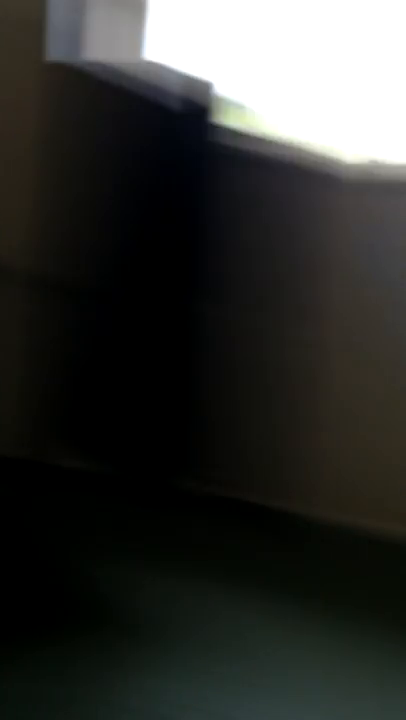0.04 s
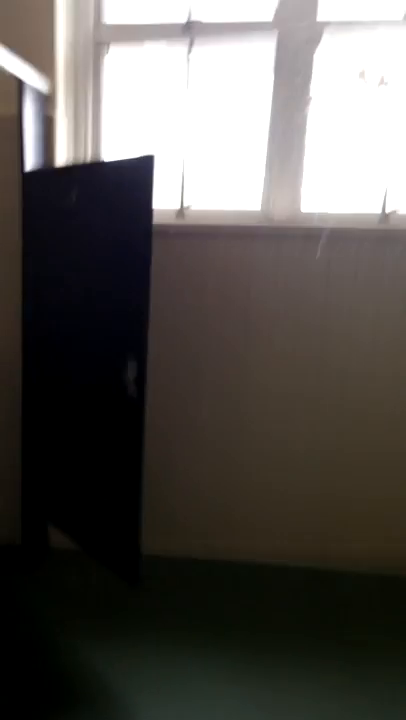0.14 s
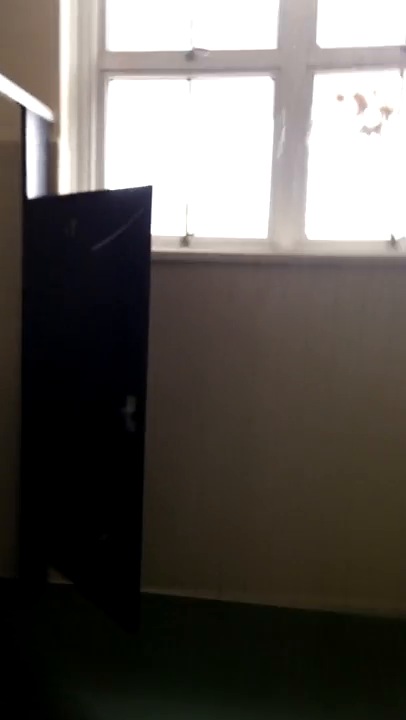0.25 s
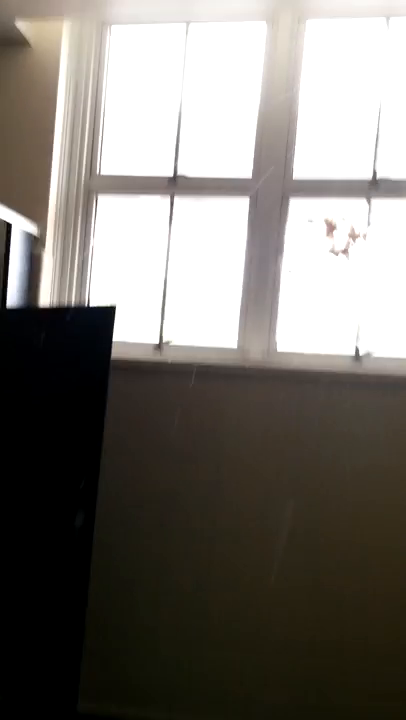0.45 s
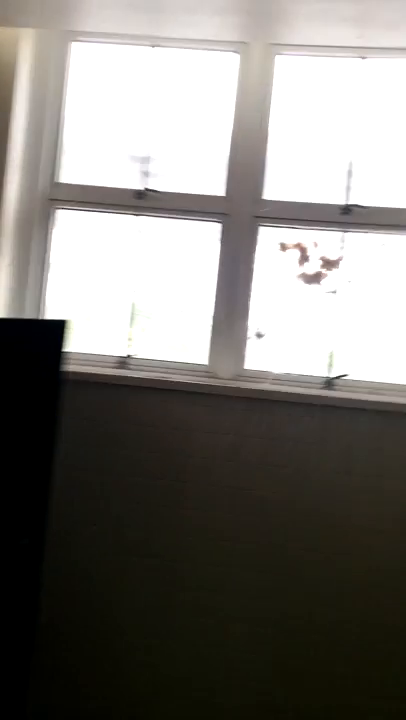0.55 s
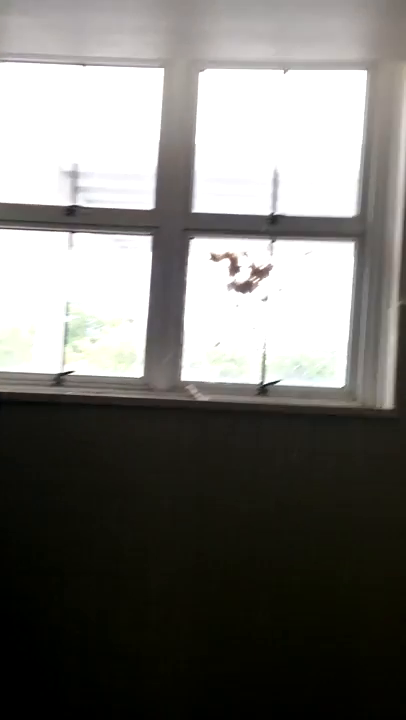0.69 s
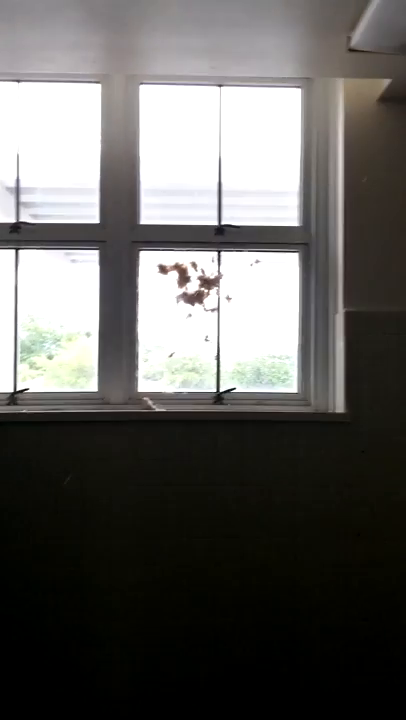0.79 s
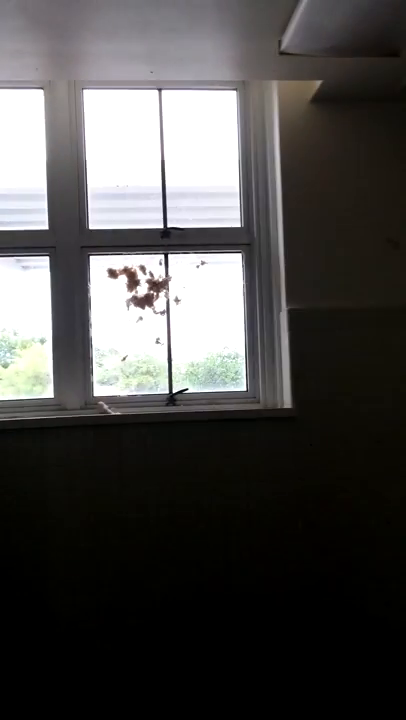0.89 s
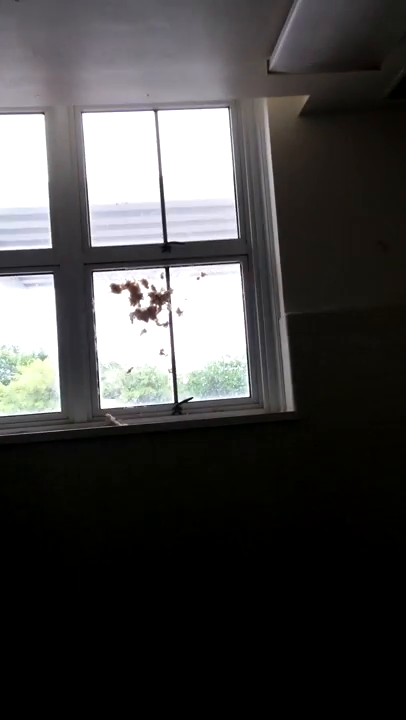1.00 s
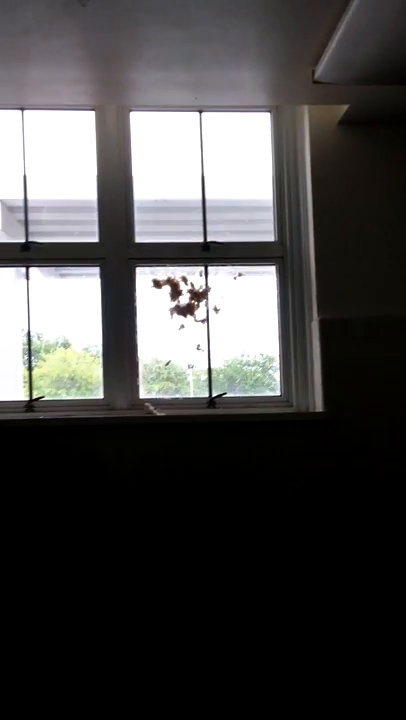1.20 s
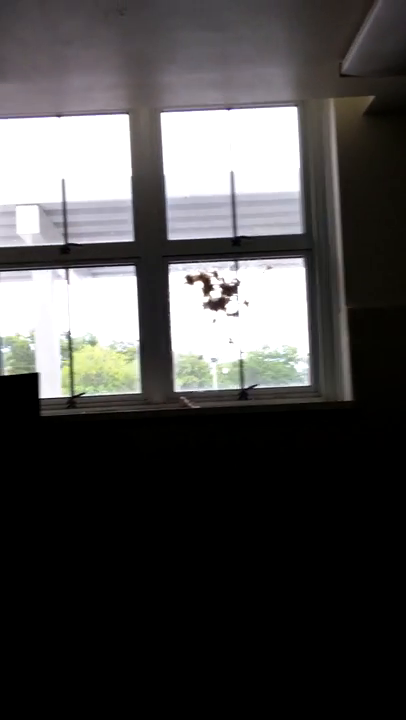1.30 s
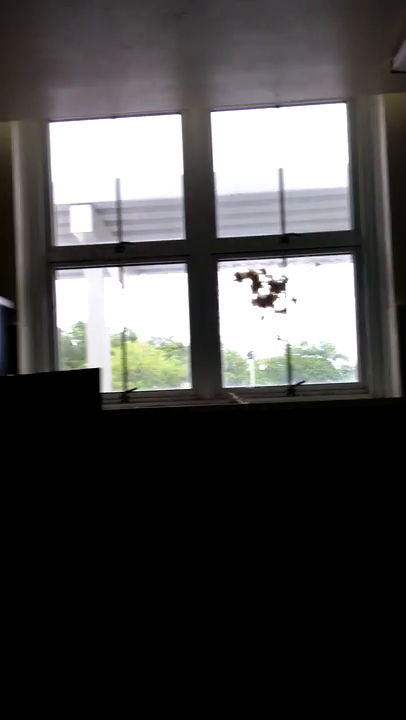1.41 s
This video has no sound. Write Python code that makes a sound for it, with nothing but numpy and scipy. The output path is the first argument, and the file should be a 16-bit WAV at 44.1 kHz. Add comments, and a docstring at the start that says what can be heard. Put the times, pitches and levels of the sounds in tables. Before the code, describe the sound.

A very loud bang of something wet bursting against a window comes at about 0.2 seconds, after a short fading hiss. Dense echoes and a low boom fill the tiled washroom and overload the microphone for a third of a second. Two scraps land with dull knocks near 0.65 and 0.8 seconds, each with a faint hiss of spray, while the echo rings on, growing duller and quieter.

```python
"""Something wet bursts against a window in a tiled washroom, as loud as a firecracker.
A short fading hiss comes first. Then the bang fills the hard room: a dense wash of echoes and a low
boom overload the microphone for a third of a second, then ring out ever duller.
A few scraps knock as they land and fine spray hisses down."""
import sys
import numpy as np
from scipy import signal
from scipy.fft import rfft, irfft, next_fast_len
from scipy.io import wavfile

SR = 44100
rng = np.random.default_rng(int(sys.argv[2]) if len(sys.argv) > 2 else 0)


def master_out(mix):
    """Clip the mix to full scale and print it as 16-bit PCM to the path in sys.argv[1]."""
    frames = np.transpose(np.atleast_2d(mix))
    ceiling = np.clip(frames, -1, 1)
    pcm = np.round(ceiling * 32767).astype(np.int16)
    wavfile.write(sys.argv[1], SR, pcm)


N = 63945

BANG_S, ATTACK_S = 0.2138, 0.0019  # when the bang starts, and how fast its echoes build up
# tone of the dense wash of echoes: f/Hz, level/dB
WASH_TONE = [(25, -13), (42, -6.5), (70, -12.5), (120, 2), (170, -3.5), (250, -2), (400, -7.5), (800, -7.5),
             (1500, -8.5), (3300, -11), (5500, -14), (10000, -19.5), (16000, -30.5)]
# time the wash takes to fade by 60 dB: f/Hz, t/s
WASH_FADE = [(35, 0.85), (100, 0.98), (300, 1.113), (1500, 1.147), (4000, 1.08), (8000, .88), (14000, 0.59)]
# tone of the longer ring between the bare walls: f/Hz, level/dB
RING_TONE = [(30, -33), (70, -7.5), (160, -9.5), (260, -7), (700, -4.5), (1400, -11.5), (2400, -16.5),
             (3300, -14.5), (4200, -14.5), (6000, -16), (12000, -56.5)]
# time that ring takes to fade by 60 dB: f/Hz, t/s
RING_FADE = [(100, 2.3), (700, 2.92), (3000, 2.91), (8000, 1)]
# the room's own notes (standing waves): f/Hz, level/dB, t/s to fade by 60 dB
ROOM_NOTES = [(70, -8, 1.5), (78.4, 0, 1.2), (92.6, -17, 1.8), (108.5, -11, 1.7), (157, -22, 2.4),
              (198, -13, 1.3), (246, -13, 1.4), (331, -13, 1.1), (350, -26, 2.6), (515, -19, 1.5),
              (538, -25, 2.5), (835, -22, 2), (3354, -31, 2.2)]
# scraps landing: t/s, level/dB
LANDINGS = [(0.651, -15), (0.781, -14)]
# showers of fine spray: t/s, level/dB
SHOWERS = [(.655, -38), (.81, -41)]
# tone of the spray: f/Hz, level/dB
SPRAY_TONE = [(1000, -28), (5000, 1), (10000, -6.5), (16000, -12)]
# tone of the hiss before the bang: f/Hz, level/dB
HISS_TONE = [(25, -22), (45, -9), (64, 1.5), (100, -15.5), (240, -16), (330, -14.5), (900, -19.5),
             (3800, -19), (7500, -23.5), (10400, -26.5), (16000, -32)]
# tone of the quiet room: f/Hz, level/dB
QUIET_TONE = [(25, -5), (60, 6.5), (300, -4), (3000, -33), (9000, -44), (16000, -49)]
# how alike the room sounds on the left and right: f/Hz, likeness (1 = the same)
LIKENESS = [(30, .9), (70, .99), (140, .97), (290, .88), (640, .55), (1400, .02), (15000, 0)]
# how much louder the left is than the right: f/Hz, level/dB
LEFT_OVER_RIGHT = [(60, 5.6), (300, -1.5), (700, -2.5), (1400, -1), (3100, -2), (7000, -2), (15000, -7)]
# tone of the microphone's left opening: f/Hz, level/dB
LEFT_TONE = [(20, -2.5), (50, 0.5), (90, 4.5), (250, 0), (600, 1.5), (3000, 0.5), (8000, 1), (9500, 2),
             (10400, 4), (11800, 4.5), (16000, 10)]
# tone of its right opening: f/Hz, level/dB
RIGHT_TONE = [(20, 0.5), (50, -0.5), (90, 5.5), (250, -0.5), (600, -2), (3000, 3.5), (8000, 0), (9500, 2.5),
              (10400, 7), (11800, -1.5), (16000, -9.5)]


def bang():
    """The hard walls throw the burst back as a strong wash of echoes and a weaker, longer ring."""
    wash = amp(7) * echoes(WASH_TONE, WASH_FADE)
    ring = amp(-14) * echoes(RING_TONE, RING_FADE)
    return wash + ring


def echoes(tone, fade_times, size=512):
    """Echoes blur into noise from the bang on, each frequency fading at its own speed."""
    hz, t, bands = signal.stft(room_noise(tone), SR, nperseg=size)
    fade = amp(-60 * np.maximum(t - BANG_S, 0) / along(fade_times, hz)[:, None])
    rise = 1 - np.exp(-since(BANG_S) / ATTACK_S)
    return signal.istft(bands * fade, SR, nperseg=size)[1][:, :N] * rise


def boom():
    """The blast sets the room's own notes ringing; notes close in pitch throb against each other."""
    t = since(BANG_S)
    notes = 0
    for k, (hz, db, fade_s) in enumerate(ROOM_NOTES):
        direction = -(-1) ** k  # neighbours start by swinging opposite ways
        notes += direction * amp(db) * dying(t, fade_s) * np.sin(2 * np.pi * hz * t)
    rise = 1 - np.exp(-t / 0.013)
    return amp(-2) * notes * rise


def scraps():
    """Each soft scrap lands with one dull push."""
    knocks = 0
    for start_s, db in LANDINGS:
        age = since(start_s) / 0.0003  # the push is strongest at age 1, after 0.3 ms
        knocks += amp(db) * age * np.exp(1 - age)
    return knocks


def spray():
    """Fine spray comes down in short, bright swells."""
    rise_s, hold_s = 0.029, 0.036
    swells = 0
    for start_s, db in SHOWERS:
        rise = np.minimum(since(start_s) / rise_s, 1)
        swells += amp(db) * rise * dying(since(start_s + hold_s), fade_s=0.44)
    return swells * room_noise(SPRAY_TONE)


def hiss():
    """A fading hiss with a low rumble, perhaps a fuse, that dies quickly once the bang comes."""
    slow_fade = amp(-27 - 26 * since(0))  # falls 26 dB each second
    ending = dying(since(BANG_S), fade_s=0.32)
    return slow_fade * ending * room_noise(HISS_TONE)


def room_noise(tone):
    """Stereo noise from all sides: left and right are alike in the bass, unrelated in the treble."""
    def share(hz):
        angle = np.arccos(np.clip(along(LIKENESS, hz), -1, 1)) / 2
        return amp(along(tone, hz)) * [np.cos(angle), np.sin(angle)]

    common, opposite = filtered(rng.standard_normal((2, N)), share)
    pair = np.array([common + opposite, common - opposite])
    pair = filtered(pair, lambda hz: amp(np.outer([.5, -.5], along(LEFT_OVER_RIGHT, hz))))
    return pair / np.sqrt(np.mean(pair ** 2) + 1e-20)  # average strength of 1


def amp(db):
    """Turn decibels into a number to multiply by."""
    return 10 ** (np.asarray(db) / 20)


def along(points, hz):
    """Read a table between its frequencies, with octaves evenly spaced."""
    f, values = np.transpose(points)
    return np.interp(np.log(hz + 1), np.log(f + 1), values)


def since(s):
    """Seconds since a moment, zero before it."""
    return np.maximum(np.arange(N) / SR - s, 0)


def dying(t, fade_s):
    """A fade that drops 60 dB every fade_s seconds."""
    return np.exp(-np.log(1000) * t / fade_s)


def filtered(x, response):
    """Multiply each frequency in x by response(hz)."""
    size = next_fast_len(N + SR // 2)
    hz = np.fft.rfftfreq(size, 1 / SR)
    return irfft(rfft(x, size) * response(hz), size)[..., :N]


def coloured(x, tone, size=4096):
    """Give x a tone with a filter that rings only after each sound, never before."""
    hz = np.fft.rfftfreq(size, 1 / SR)
    log_ring = irfft(np.log(amp(along(tone, hz))))
    log_ring[1:size // 2] *= 2  # move the early half onto the late half
    log_ring[size // 2 + 1:] = 0
    ring = irfft(np.exp(rfft(log_ring)))
    return signal.fftconvolve(x, ring)[:N]


def overload(x, top_db, hardness=10):
    """Peaks that are too loud flatten against a top level."""
    return x / (1 + np.abs(x / amp(top_db)) ** hardness) ** (1 / hardness)


def scene():
    """Everything that reaches the microphone, over the faint rumble of the room."""
    return hiss() + bang() + boom() + scraps() + spray() + amp(-44.5) * room_noise(QUIET_TONE)


def record(dry):
    """The microphone overloads and shapes the tone; the bass lags, peaks flatten and the top is cut."""
    lag_below_hz, top_hz = 281.5, 15900
    left, right = overload(dry, top_db=-7)
    toned = np.array([coloured(left, LEFT_TONE), coloured(right, RIGHT_TONE)])
    # delay the bass without changing how loud it is
    lagged = filtered(toned, lambda hz: (lag_below_hz - 1j * hz) / (lag_below_hz + 1j * hz))
    flattened = overload(lagged, top_db=-1.5)
    return filtered(flattened, lambda hz: 1 / (1 + (hz / top_hz) ** 200))


dry = scene()
out = record(dry)
master_out(out)
```